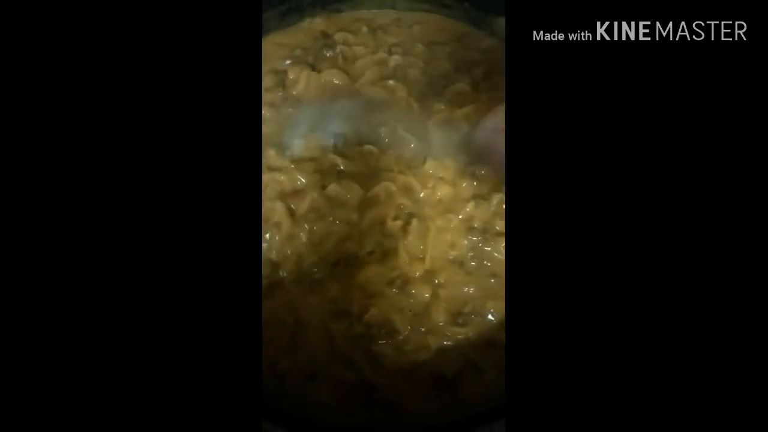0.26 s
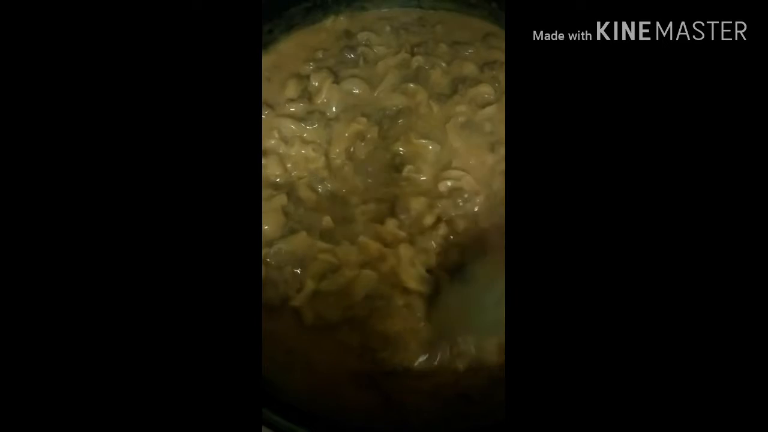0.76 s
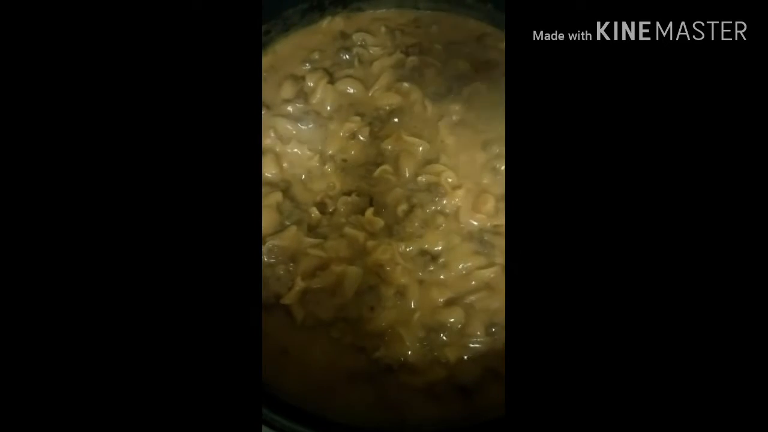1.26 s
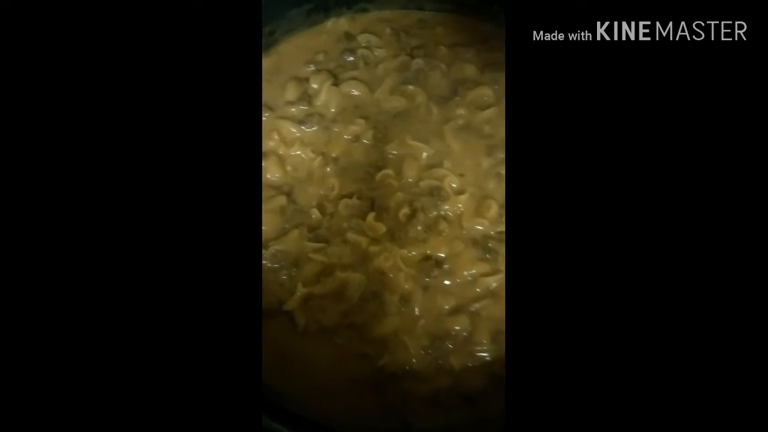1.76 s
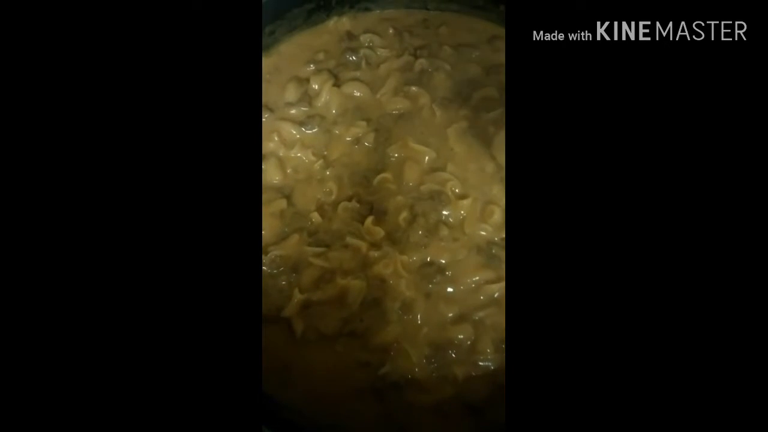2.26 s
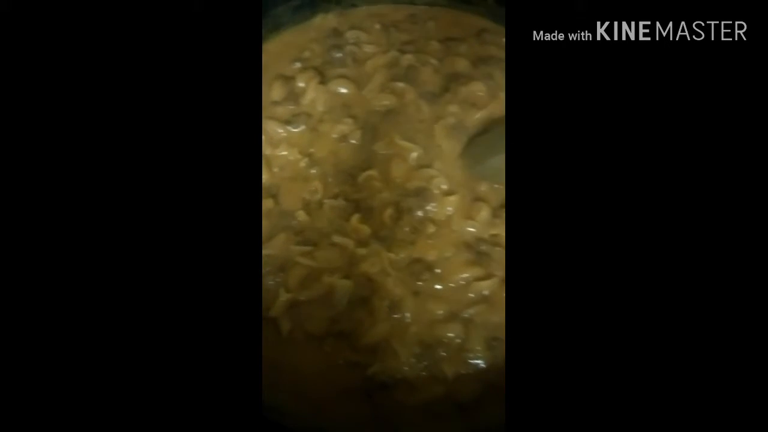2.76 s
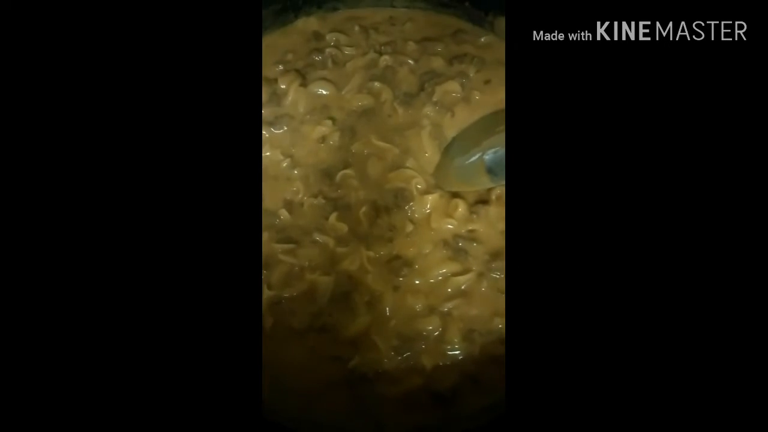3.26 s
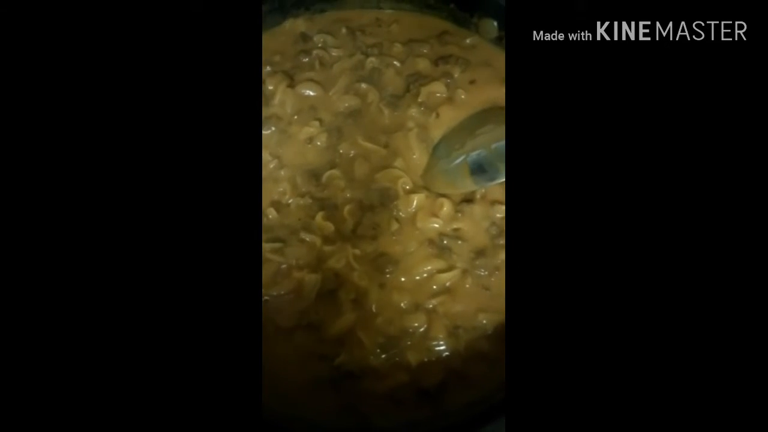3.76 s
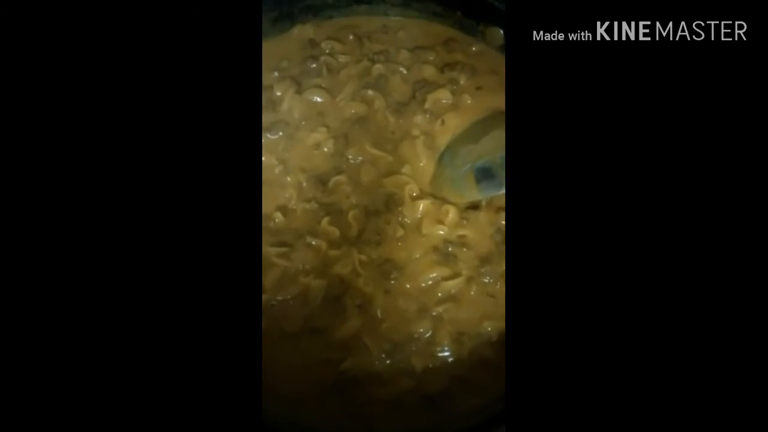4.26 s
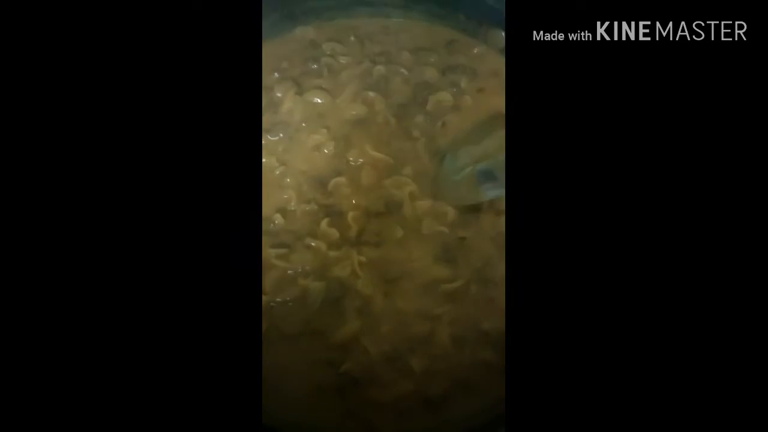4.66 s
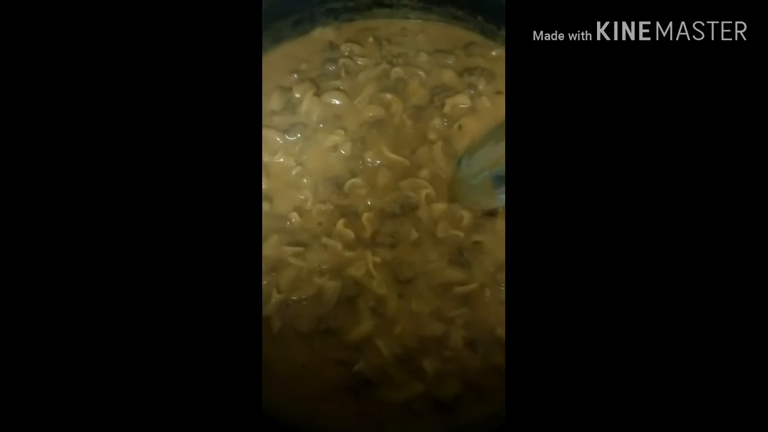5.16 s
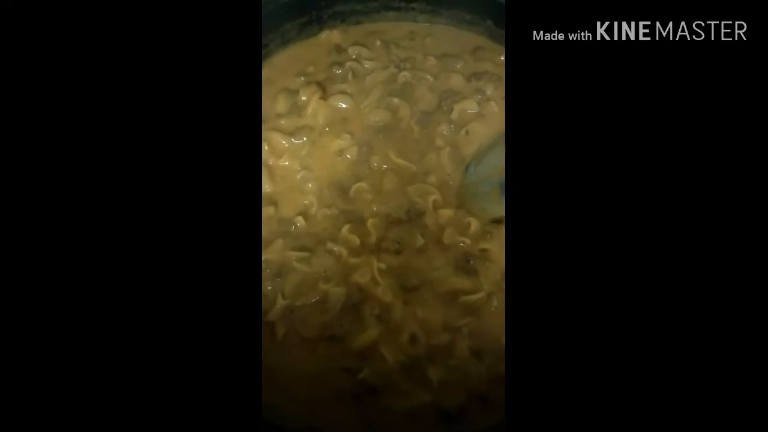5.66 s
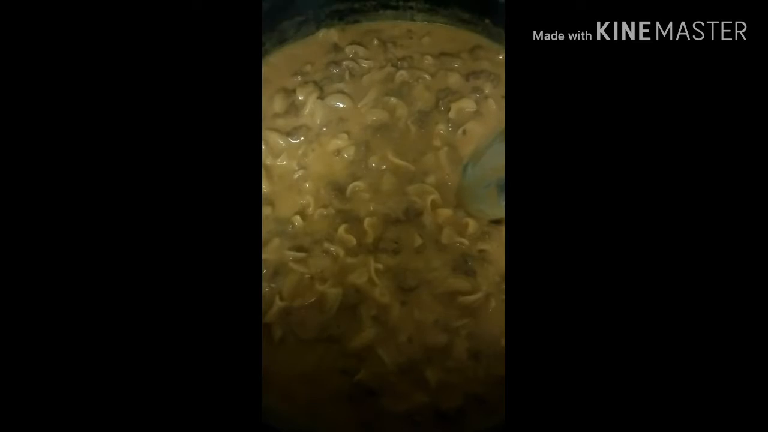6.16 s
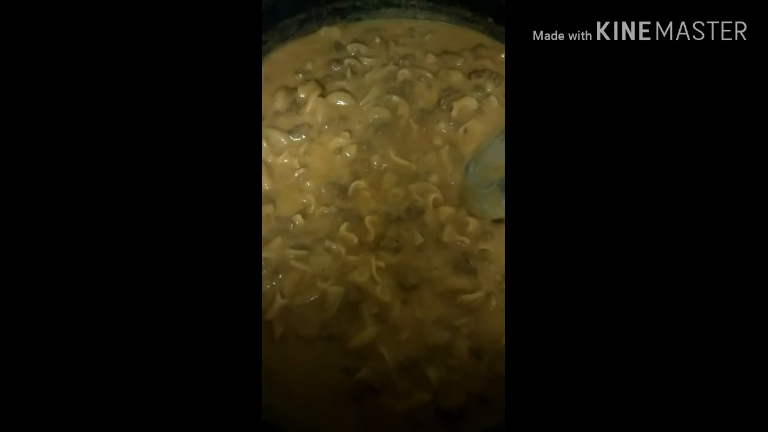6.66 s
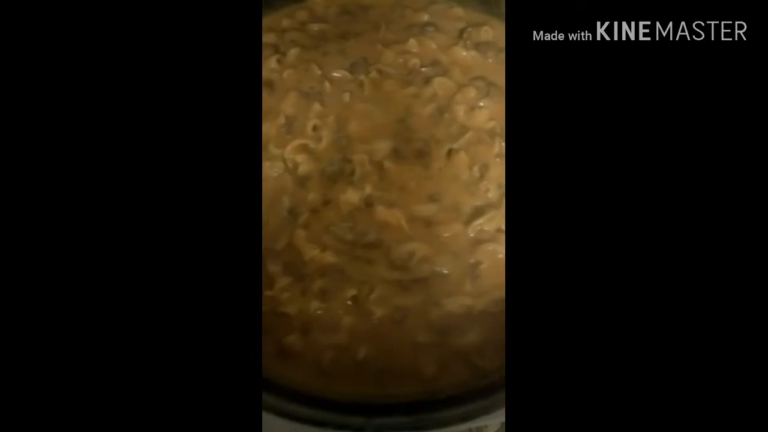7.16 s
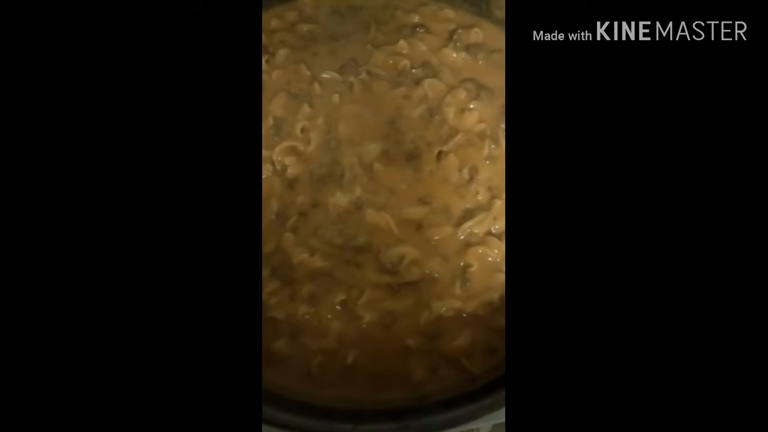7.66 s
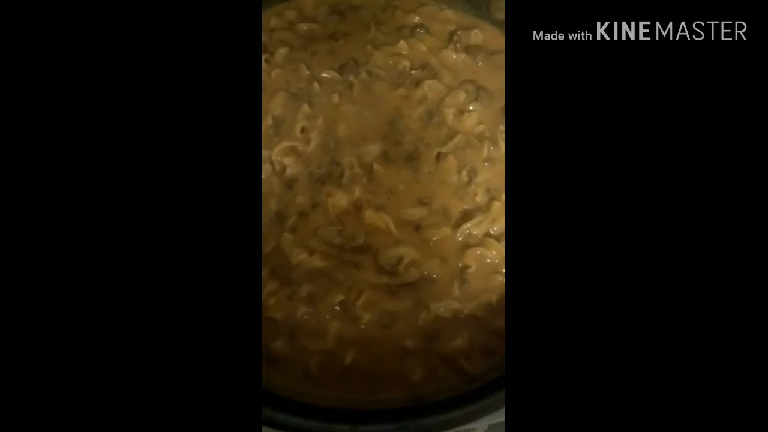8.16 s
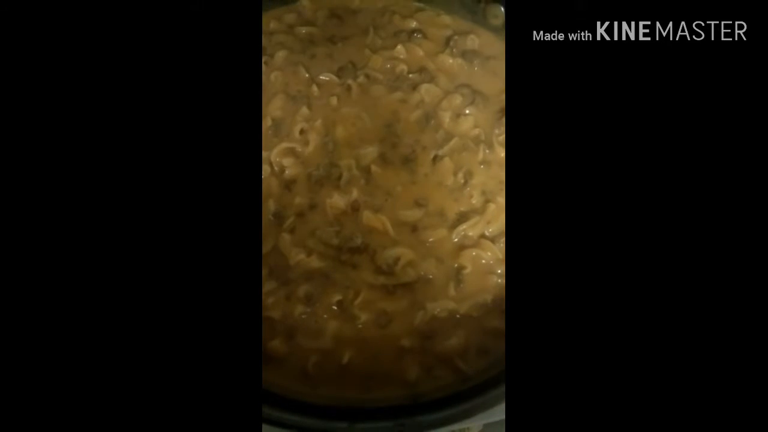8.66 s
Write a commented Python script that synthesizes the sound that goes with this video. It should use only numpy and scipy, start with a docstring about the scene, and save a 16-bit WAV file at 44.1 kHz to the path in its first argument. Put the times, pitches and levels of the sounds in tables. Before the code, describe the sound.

A spoon drags through thick bubbling stew, knocks sharply on a metal pan's rim, then wet spits and pops continue over a soft sizzle.

```python
"""A spoon drags through thick stew in a metal pan, then is knocked clean on the wall and rim of the pan.
Bubbles burst in spits and pops over a wet sizzle: bands of noise, and struck modes for the metal. It is a small
kitchen, heard by a hand-held two-port microphone: a short dull tail and a low room tone. The left port hears
the pan muffled until late on; the hand's grip rumbles and bumps in both ports."""
import sys
import numpy as np
from scipy import signal
from scipy.fft import rfft, irfft, next_fast_len
from scipy.io import wavfile

SR = 44100
rng = np.random.default_rng(int(sys.argv[2]) if len(sys.argv) > 2 else 0)


def materialize(psi):
    """Save the field psi as 16-bit PCM at rate SR to the path in sys.argv[1].

    A 1-D psi becomes a single channel; in a 2-D psi each row is a channel.
    """
    bounded = np.clip(np.atleast_2d(psi).T, -1, 1)
    quanta = np.round(bounded * 32767).astype(np.int16)
    wavfile.write(sys.argv[1], SR, quanta)


N = 392870

# loud bursting bubbles, levels before the part gains: t/s, spit level/dB, snap f/Hz, snap level/dB, plop level/dB
BUBBLES = [(0.396, -35, 3200, -66, -59), (0.476, -59, 4600, -47, -51), (0.71, -43, 4700, -45, -41.5),
           (0.8714, -46, 4800, -42, -61), (0.9406, -48, 2310, -52.5, -66), (0.9526, -39.5, 2140, -58, -62),
           (1.1757, -37, 3320, -49.5, -44.5), (1.4187, -36.5, 2270, -57, -48.5),
           (1.466, -39, 1670, -56, -56), (1.7737, -51, 3850, -52.5, -58), (1.8841, -35, 2820, -44.5, -73),
           (1.9164, -45, 4830, -44.5, -45.5), (1.9657, -41, 3850, -46, -51), (2.3854, -50, 2750, -52, -59),
           (2.7491, -27.5, 5010, -50, -36.5), (2.8413, -35.5, 1930, -55, -56),
           (2.9002, -33, 2380, -51, -47.5), (2.9636, -38, 4960, -57, -60), (3.04, -36, 3330, -52, -53),
           (3.0554, -52, 3770, -53, -58), (3.3598, -46, 3130, -48, -49.5), (3.4233, -34.5, 4470, -59, -54),
           (3.5648, -35.5, 4860, -46.5, -46), (3.717, -40, 4000, -53, -52.5), (3.7599, -41, 4510, -48, -52),
           (3.7897, -37, 3290, -55.5, -59), (3.8712, -34.5, 3100, -44.5, -54),
           (3.893, -41, 1900, -51.5, -52), (4.0467, -36, 4600, -41.5, -47), (4.2887, -34, 4700, -54, -50),
           (4.3245, -41.5, 3400, -55, -47.5), (4.5133, -38, 2860, -40.5, -51.5),
           (4.5365, -31, 5050, -58, -48), (4.6258, -34, 4550, -47, -50.5), (4.7862, -46, 3770, -49, -61),
           (4.8222, -34, 3970, -46, -48), (4.8919, -51, 3570, -47, -66), (4.9708, -39, 3180, -43, -40.5),
           (5.029, -42, 3060, -50.5, -52), (5.0564, -52, 4400, -48, -69), (5.1122, -43, 2880, -50.5, -54.5),
           (5.2102, -53, 3810, -52.5, -56), (5.2364, -41.5, 3670, -47, -52), (5.2711, -38, 4020, -49, -53),
           (5.352, -41, 1960, -50, -51.5), (5.3956, -35, 4590, -42, -39.5), (5.442, -47, 4760, -45.5, -63),
           (5.5014, -42, 3100, -54, -73), (5.5094, -51, 3280, -50.5, -77), (5.5376, -31.5, 5200, -50, -61),
           (5.6213, -36, 5230, -53, -50.5), (5.691, -44, 4130, -53, -52), (5.7147, -38, 3830, -44, -55),
           (5.8365, -50, 3190, -52.5, -73), (5.9176, -40.5, 4560, -53.5, -49.5),
           (5.972, -50, 3880, -52.5, -72), (6.0007, -41, 4050, -42.5, -40), (6.0507, -38.5, 5300, -49, -56),
           (6.08, -48, 3800, -48, -65), (6.1012, -41, 2570, -52, -46.5), (6.1941, -42, 4400, -48, -49),
           (6.2096, -34, 3660, -46.5, -52), (6.2748, -38, 3380, -61, -52.5), (6.325, -30, 4870, -43, -60),
           (6.3936, -43, 1980, -53, -65), (6.4119, -35.5, 4860, -40.5, -46), (6.5171, -36, 3500, -44, -53),
           (6.624, -35.5, 2130, -48, -48), (6.649, -37.5, 3670, -45.5, -42), (6.7285, -46, 3660, -55, -66),
           (6.7535, -41, 1940, -47.5, -45), (6.788, -41.5, 4160, -49, -47.5), (6.8367, -60, 3100, -51, -55),
           (6.8632, -43.5, 3940, -50, -48.5), (6.9146, -37.5, 3870, -47, -48.5),
           (6.9714, -41, 2980, -49.5, -62), (7.0076, -43, 4730, -44.5, -47), (7.0284, -39, 1950, -58, -63),
           (7.0567, -52, 2500, -49, -45), (7.091, -43, 3180, -43, -40.5), (7.1324, -48, 2740, -49, -61),
           (7.1538, -53.5, 2730, -61, -61), (7.6053, -50, 2330, -56, -67), (7.7165, -42, 2810, -47, -66),
           (7.7463, -50, 3020, -74, -76), (7.7866, -46.5, 2900, -54, -65), (7.8044, -47, 3090, -63, -65),
           (7.894, -44, 4020, -53, -57), (8.0063, -50.5, 4500, -58, -68), (8.14, -47.5, 3110, -57.5, -57),
           (8.3016, -55.5, 2300, -54, -61), (8.372, -43.5, 3600, -53, -66), (8.4163, -45, 2400, -57, -61.5),
           (8.4697, -41.5, 2850, -50.5, -58), (8.6432, -54.5, 4770, -55.5, -78),
           (8.711, -41, 2820, -46, -52), (8.8805, -49, 4170, -49, -69)]


def amp(db):
    """Decibels to gain."""
    return 10 ** (np.asarray(db) / 20)


def rms_one(x):
    """Scale to rms 1."""
    return x / np.sqrt(np.mean(x ** 2) + 1e-20)


def in_time(rows):
    """Each column of a curve table, sample by sample."""
    s, *columns = np.transpose(rows)
    return [np.interp(np.arange(N) / SR, s, c) for c in columns]


def at_hz(points, hz):
    """Read a (f/Hz, value) table on a log axis."""
    return np.interp(np.log(hz), np.log(np.array(points)[:, 0]), np.array(points)[:, 1])


def coloured(x, spectrum):
    """Shape by a (f/Hz, level/dB) table."""
    size = next_fast_len(N)
    hz = np.maximum(np.arange(size // 2 + 1) * SR / size, 1)
    return irfft(rfft(x, size) * amp(at_hz(spectrum, hz)), size)[..., :N]


def band(x, low_hz, high_hz):
    """Causal band-pass."""
    edges = [low_hz, min(high_hz, .45 * SR)]
    return signal.sosfilt(signal.butter(2, edges, "band", fs=SR, output="sos"), x)


def drift(rate_hz):
    """Random wander of rms 1, twice low-passed at rate_hz and drawn once every 40 samples."""
    r = np.exp(-80 * np.pi * rate_hz / SR)
    slow = signal.lfilter([1], [1, -2 * r, r * r], rng.standard_normal(N // 40 + 2002))[2000:]
    return np.interp(np.arange(N) / 40, np.arange(len(slow)), rms_one(slow))


def add(out, s, burst):
    """Mix a burst in at a time."""
    i = round(s * SR)
    out[..., i:i + burst.shape[-1]] += burst[..., :N - i]


def room_tone(level_db):
    """Burner and far hum: low noise mostly shared by the ports, with a weaker part in opposite sign."""
    # burner and far hum: f/Hz, level/dB per Hz
    hum_colour = [(18, -29.5), (30, -10.5), (119, 3), (162, -14.5), (225, 3), (338, -10.5), (462, -24),
                  (1380, -29), (1500, -34), (1950, -58), (3300, -120)]
    shared, own = rms_one(coloured(rng.standard_normal((2, N)), hum_colour))
    return amp(level_db) * (shared + .3 * own * [[1], [-1]])


def kitchen(x):
    """Reflections from a small room: a short dull noise tail for each port."""
    t60_s, tail_db = 0.19, -16.5
    t = np.arange(SR // 3) / SR
    tails = band(rng.standard_normal((2, len(t))), 53, 9000) * amp(-60 * t / t60_s) * (t > .004)
    tails = tails / np.sqrt(np.sum(tails ** 2, axis=1, keepdims=True))
    return amp(tail_db) * signal.fftconvolve(x[None], tails, axes=1)[:, :N]


def grip(alike, lumpy_db, pan_db):
    """A hand on the microphone body: lumpy low noise, partly alike in both ports."""
    # grip noise, before its lumps: t/s, level/dB
    grip_level = [(0, -64), (.4, -55.5), (.9, -48), (1.3, -54), (1.5, -59), (1.8, -46), (2.05, -52.5),
                  (2.75, -51), (2.9, -49.5), (3.25, -48), (3.47, -60.5), (4.09, -59), (4.3, -51),
                  (4.7, -60), (4.95, -48), (5.25, -55.5), (6.3, -62), (6.45, -56.5), (7.1, -59.5),
                  (7.5, -65), (8.91, -62)]
    # grip noise: f/Hz, level/dB per Hz
    grip_colour = [(15, -42.5), (25, 4.5), (48, 8), (75, -0.5), (99, -9.5), (209, -18), (251, -29),
                   (400, -18.5), (520, -57), (880, -120)]
    level_db, = in_time(grip_level)
    mid, side = rms_one(coloured(rng.standard_normal((2, N)), grip_colour))
    pair = mid + np.sqrt(1 - np.clip(alike, 0, 1)) * side * [[1], [-1]]
    return pair * amp(level_db + lumpy_db * drift(8.3) + pan_db * np.array([[.5], [-.5]]))


def bumps():
    """Bumps and finger taps on the casing: each swells and dies as a short pitched push."""
    # bumps and taps: t/s, level/dB, f/Hz, swell/s, left minus right/dB
    taps = [(0.812, -24, 72, 0.0098, -5), (0.937, -31.5, 87.5, 0.01, -6), (1.714, -40, 232, 0.0064, -6),
            (1.714, -38, 86.5, 0.0077, -7), (4.145, -39.5, 81, 0.0065, -6.5),
            (4.193, -39.5, 88, 0.011, -3.5), (4.249, -35, 49.4, 0.014, -2), (5.315, -49, 83, 0.014, 32),
            (6.961, -53, 105, 0.01, 27), (7.306, -37.5, 833, 0.00093, 15.5),
            (7.571, -47.5, 250, 0.00039, 21), (7.641, -53, 250, 0.00045, 26)]
    out, t = np.zeros((2, N)), np.arange(SR // 4) / SR
    for s, level_db, hz, swell_s, pan_db in taps:
        swelling = t / swell_s * np.exp(1 - t / swell_s)
        push = swelling * np.cos(2 * np.pi * hz * t)
        add(out, s, push * amp(level_db + np.array([[.5], [-.5]]) * pan_db))
    return out


def sizzle(per_s, spread_db, grain_share):
    """Tiny bursts in clumps, each ringing briefly in one of eight bands, over wavering wet hiss."""
    # wet sizzle of the simmer: t/s, level/dB
    sizzle_level = [(0, -58.5), (1.3, -57.5), (1.9, -57.5), (2.5, -54.5), (3.6, -56.5), (5.85, -58.5),
                    (6.25, -54), (6.95, -55), (7.14, -55.5), (7.2, -72.5), (8.91, -68.5)]
    # equalisation of the sizzle: f/Hz, level/dB
    sizzle_colour = [(300, -25.5), (550, 11.5), (860, 0.5), (1250, 0.5), (3500, 0.5), (5300, -6.5),
                     (7200, 8), (9000, -16.5), (13800, -14.5), (15000, -31.5)]
    level_db, = in_time(sizzle_level)
    born = rng.random(N) < per_s * amp(6 * drift(15)) / SR
    size = amp(spread_db * np.minimum(rng.exponential(1, N), 4))
    grains = born * size * rng.standard_normal(N) + 1e-18
    dealt, white = rng.integers(0, 8, N), rng.standard_normal((2, N))
    wet = 0
    for k, hz in enumerate(np.geomspace(500, 11000, 8)):
        wavering_hiss = white[k % 2] * amp(4.5 * drift(25))
        mix = grain_share * rms_one(grains * (dealt == k)) + wavering_hiss
        wet = wet + band(mix, hz / 1.45, hz * 1.49)
    return amp(level_db) * rms_one(coloured(wet, sizzle_colour))


def small_pops():
    """Faint bursts gather before and after the loud ones, which unsettle the skin nearby; rows as in BUBBLES."""
    count, within_s, under_db, spread_db = 90, .05, 11, 3.5
    late, *tone = rng.standard_normal((count, 4)).T
    s, spit_db, _, snap_db, plop_db = np.array(BUBBLES)[rng.integers(0, len(BUBBLES), count)].T
    s = np.clip(s + within_s * late, .02, N / SR - .02)
    levels_db = np.array([spit_db, snap_db, plop_db]) - under_db
    spit_db, snap_db, plop_db = levels_db + spread_db * np.array(tone)
    return list(zip(s, spit_db, rng.uniform(1800, 5000, count), snap_db, plop_db))


def pops(click_db, t60_s, spray_db, spray_t60_s, drops_per_s, drop_db):
    """Each bubble breaks with a click: the cavity plops, the skin snaps at its own pitch, it spits spray and drops."""
    plop_gain_db, snap_gain_db, spit_gain_db = 10.5, 15, 7.5   # peak of each part over its listed level
    spit_hz, spit_width, snap_width = 7200, 1.25, 1.25   # widths: band edges as ratios to the centre
    out, t = np.zeros(N), np.arange(SR // 12) / SR - .01
    at = np.argmin(abs(t))   # the sample where the skin breaks
    for s, spit_db, hz, snap_db, plop_db in BUBBLES + small_pops():
        wet_db, lasting, size = rng.normal(0, 2.5), rng.uniform(.4, 1.2), amp(rng.normal(0, .5))
        # spray swells quickly ahead of the break and dies slowly after it
        spray_age = np.where(t < 0, -6 * t, t)
        spray = amp(spray_db + wet_db - 60 * spray_age / (spray_t60_s * lasting))
        ragged = amp(2.7 * rng.standard_normal(len(t) // 40 + 1).repeat(40)[:len(t)])
        drops = amp(drop_db) * (rng.random(len(t)) < drops_per_s / SR)
        breaking = (t > 0) * amp(-60 * abs(t) / t60_s)
        burst = rng.standard_normal((3, len(t))) * ((breaking + spray) * ragged + spray * drops)
        burst[:, at] = amp(click_db)
        plop = band(burst[0], 350 * size, 1300 * size)
        snap = band(burst[1], hz / snap_width, hz * snap_width) + amp(-11) * band(burst[1], 1100, 5500)
        edges = spit_hz * size / spit_width, spit_hz * size * spit_width
        spit = band(band(burst[2], *edges), *edges) + amp(-16.5) * band(burst[2], 8600, 14500)
        parts = np.array([plop, snap, spit])
        peaks = amp([plop_db + plop_gain_db, snap_db + snap_gain_db, spit_db + spit_gain_db])
        add(out, s + t[0], rng.choice([-1, 1]) * (peaks / abs(parts).max(axis=1)) @ parts)
    return out


def scrape(rough_db):
    """Spoon dragged through the food: dense, stuttering wet friction; each stroke digs in, sags and lifts off."""
    # strokes: start t/s, length/s, level at the start/dB
    strokes = [(-.05, 0.28, -40.5), (0.52, 0.071, -51), (0.691, 0.23, -44)]
    # wet friction: f/Hz, level/dB per Hz before the stutter
    friction_colour = [(300, -5.5), (700, -2.5), (1250, 0), (1900, -3.5), (4000, -8), (5500, -3), (7200, 5),
                       (9000, -5.5), (13800, -16.5), (15000, -21.5)]
    rise_db_per_s, sag_db_per_s, lift_db_per_s = 400, 30.5, 495
    t, stroke = np.arange(N) / SR, 0
    for s, length_s, level_db in strokes:
        sag_db = sag_db_per_s * np.clip(t - s, 0, length_s)
        dig_db = rise_db_per_s * np.maximum(s - t, 0)
        lift_db = lift_db_per_s * np.maximum(t - s - length_s, 0)
        stroke = stroke + amp(level_db - sag_db - (dig_db + lift_db))
    friction = rng.standard_normal(N) * amp(rough_db * (drift(270) + 0.5 * drift(38)))
    return stroke * rms_one(coloured(friction, friction_colour))


def knocks(modes_db, clatter_db, crack_db):
    """Each blow strikes the pan's clear modes and a dense clatter that dies band by band."""
    # spoon on the pan: full contact t/s, blow level/dB, then relative levels of body (300 Hz)/dB,
    # ring (1.5 kHz)/dB and crack (6 kHz)/dB, decay scale (ratio), spot (0 rim to 1 wall)
    blows = [(1.0241, -4, -25.5, -14.5, -7, 0.4, 1), (1.029, -12, -31, -6.5, -11, 0.86, 1),
             (2.1135, -15, -17.5, -14.5, 0.5, 1.03, 0.058), (2.2706, 0, -22.5, -20, -5, 1.14, 0.087),
             (2.4475, -4, -19, -17.5, -3.5, 1.3, 0.023), (2.635, 2, -24, -21.5, -6, 1.1, 0.013),
             (3.097, -8.5, -34, -19, -4.5, 1.05, 0.41), (3.137, -15.5, -13, -18, -6, 1.34, 0.17),
             (3.148, -20, -15, -13.5, -1.5, 0.57, .1), (3.2817, -22.5, -32, -15, -2.5, 1, 0.63)]
    # modes of pan and stove top: f/Hz, level struck on the rim/dB, level struck on the wall/dB, t60/s before scaling
    modes = [(72, -9, -12, .45), (139, -9, -10, .35), (290, -5, 0, .14), (447, -5, -8, .13),
             (548, -5, 3, .27), (616, -5, 7, .17), (921, -9, -14, .1), (1280, -8, -5, .11),
             (1497, -11, -12, .3), (1760, -9, -14, .12), (1948, -14, 8, .06), (2020, -22, -10, .2),
             (5920, -5, -9, .016), (6810, -3, -12, .016)]
    # dense ringing of pan and stove: f/Hz, level/dB
    clatter_colour = [(35, -31.5), (60, -3.5), (280, -3), (559, 0), (810, -10), (1520, 1.5), (1910, -9),
                      (2100, -18), (2360, -13), (4960, -24), (5710, -22), (7030, -14), (14100, -36.5),
                      (15500, -34)]
    # its decay, before the blow's scale: f/Hz, t60/s
    clatter_t60 = [(60, 0.44), (160, 0.6), (420, 0.51), (1100, 0.15), (2910, 0.11), (7680, 0.093)]
    soft_damping = .08   # softer blows leave the spoon on the metal: ring shortens this many dB per dB
    wall_clank_hz, wall_clank_db = 4200, 13.5   # blows on the wall are brighter here
    crack_t60_s, crack_cycles = .014, 13   # the first crack dies fast, the lows a little later
    out, t = np.zeros(N), np.arange(SR // 5 * 2) / SR
    edges = 50 * 2 ** np.arange(0, 8.6, .5)
    for s, blow_db, *part_db, scale, spot in blows:
        tilt = list(zip([300, 1500, 6000], part_db))
        burst, white = np.zeros(len(t)), rng.standard_normal((2, len(t)))
        for hz, rim_db, wall_db, t60_s in modes:
            spot_db = rim_db + spot * (wall_db - rim_db)
            strength = amp(modes_db + spot_db + at_hz(tilt, hz) + rng.normal(0, 2))
            dying = amp(-60 * t / (t60_s * scale * amp(soft_damping * blow_db)))
            building = 1 - np.exp(-t * hz / 0.5)   # a mode takes a cycle or two to build
            burst += strength * np.sin(2 * np.pi * hz * t) * dying * building
        for k, (low, high) in enumerate(zip(edges, edges[1:])):
            hz = np.sqrt(low * high)
            ringing = amp(-60 * t / (at_hz(clatter_t60, hz) * scale))
            crack = amp(crack_db - 60 * t / (crack_t60_s + crack_cycles / hz))
            clank_db = spot * wall_clank_db * np.exp(-(np.log(hz / wall_clank_hz) / 0.7) ** 2)
            strength = amp(clatter_db + clank_db + at_hz(clatter_colour, hz) + at_hz(tilt, hz))
            burst += strength * band(white[k % 2] * (ringing + crack), low, high)
        add(out, s, amp(blow_db) * burst)
        # the spoon grazes before it lands
        add(out, s - .003, amp(blow_db - 28.0) * white[0, :150] * np.linspace(.2, 1, 150))
    return out


def two_ports(pan):
    """The pan reaches the left port later and, until late on, muffled; room treble leaks past."""
    # muffled left port against the open one: f/Hz, level/dB
    muffle_colour = [(60, -7.5), (125, -9), (250, -4.5), (500, -15), (1000, -19.5), (2500, -18),
                     (5000, -38), (9000, -29), (15000, -21.5)]
    clear_s, left_lag = 7.17, 9   # lag in samples
    muffle_cut_hz = 3600   # the direct sound reaches the muffled port mainly below this
    left, right = kitchen(pan)
    direct = np.roll(pan, left_lag)
    leak = amp(5) * band(left, 410, 15000)
    muffled = coloured(band(direct, 15, muffle_cut_hz) + leak, muffle_colour)
    before_clear = np.arange(N) < clear_s * SR
    return np.array([np.where(before_clear, muffled, direct + left), pan + right])


def scene():
    """Pan and spoon in the kitchen, with room tone and handling noise at the two ports."""
    bubbles = pops(click_db=12.0, t60_s=0.004, spray_db=-15.5, spray_t60_s=0.12, drops_per_s=68, drop_db=21.5)
    spoon = knocks(modes_db=1.5, clatter_db=10.0, crack_db=8.0) + scrape(rough_db=3.0)
    pan = bubbles + spoon + sizzle(per_s=900, spread_db=3, grain_share=1.2)
    ports = two_ports(pan) + room_tone(level_db=-65)
    return ports + grip(alike=0.73, lumpy_db=5.0, pan_db=-3.5) + bumps()


def record(dry):
    """Each port adds its own hiss; deep bass and the top are cut, peaks clip."""
    # hiss of each port: f/Hz, level/dB per Hz
    hiss_colour = [(200, 7), (1000, 0), (3000, 1), (7000, -1), (12500, 0.5), (14300, -1.5), (14900, -49.5)]
    hiss_db, rumble_cut_hz, top_cut_hz = -65, 50.7, 16200
    hiss = amp(hiss_db) * rms_one(coloured(rng.standard_normal((2, N)), hiss_colour))
    wet = signal.sosfilt(signal.butter(4, rumble_cut_hz, "high", fs=SR, output="sos"), dry + hiss)
    clipped = np.clip(wet, -.82, .82)
    return signal.sosfilt(signal.cheby2(16, 110, top_cut_hz, fs=SR, output="sos"), clipped)


dry = scene()
out = record(dry)
materialize(out)
```